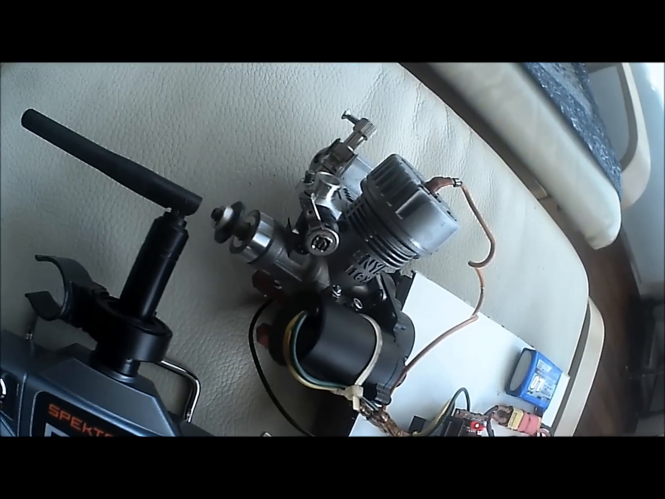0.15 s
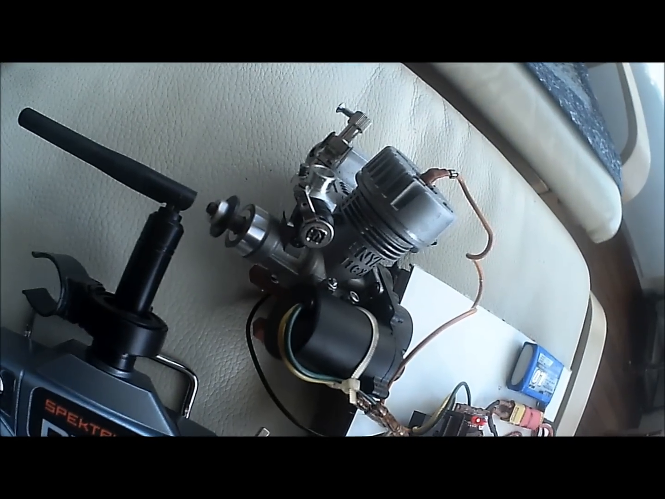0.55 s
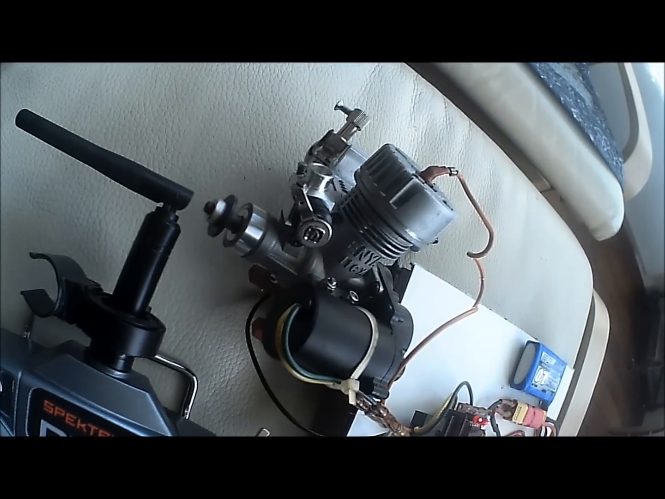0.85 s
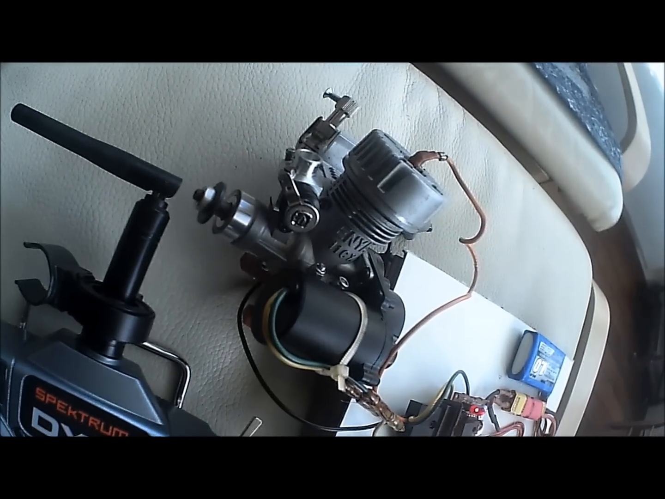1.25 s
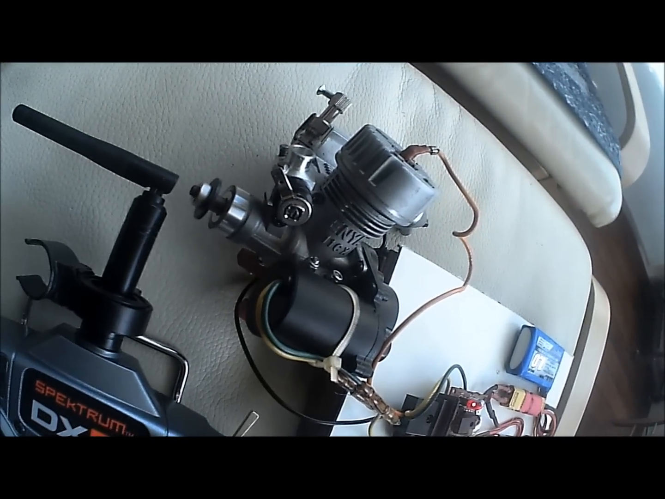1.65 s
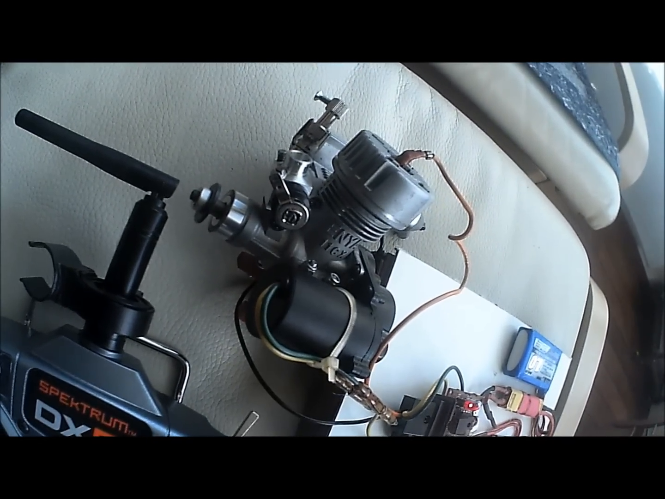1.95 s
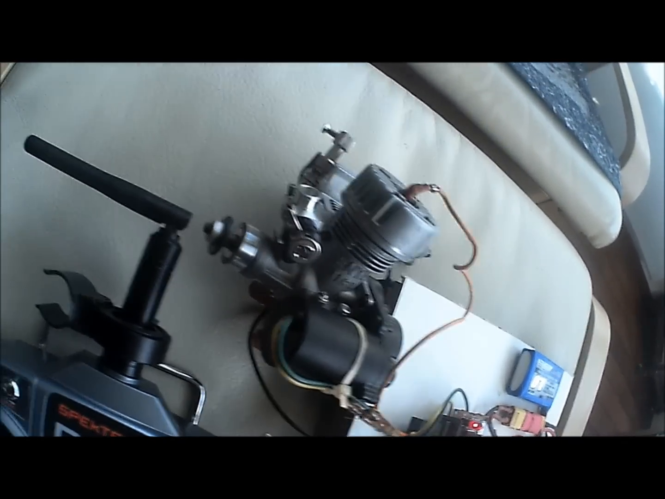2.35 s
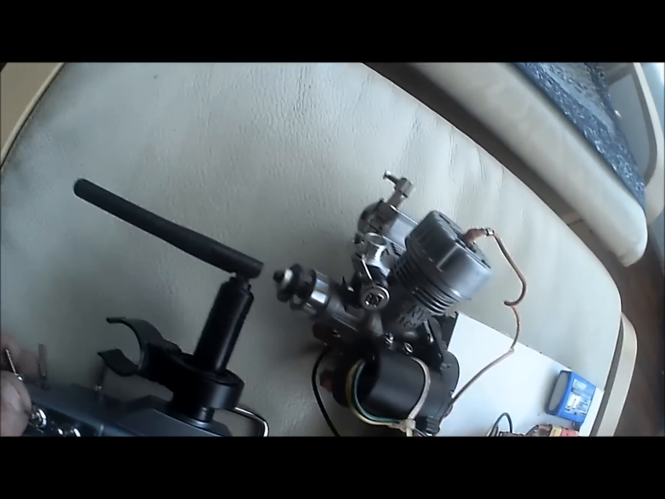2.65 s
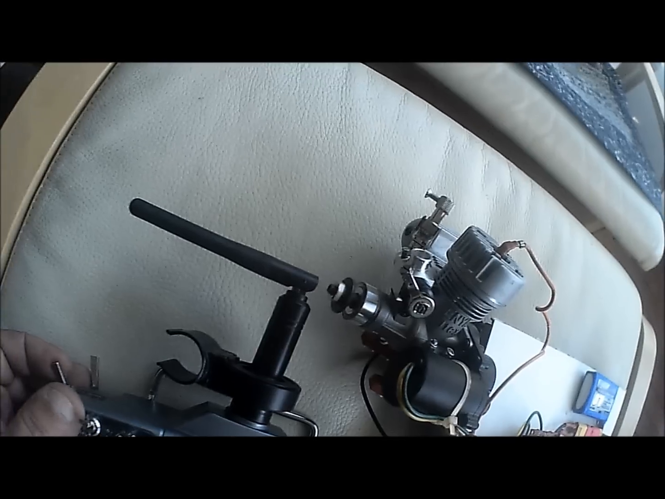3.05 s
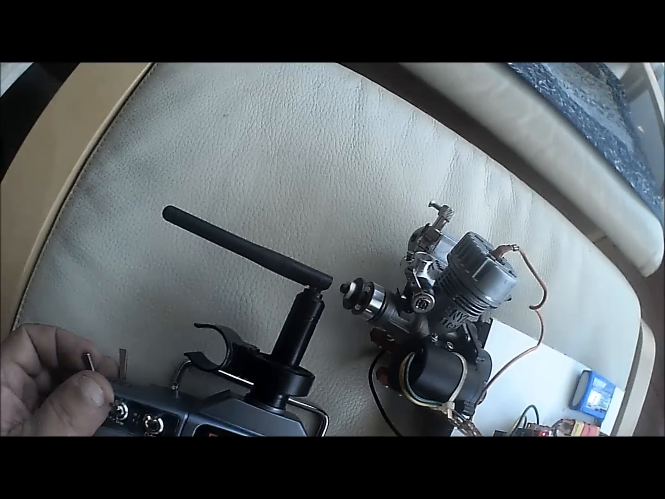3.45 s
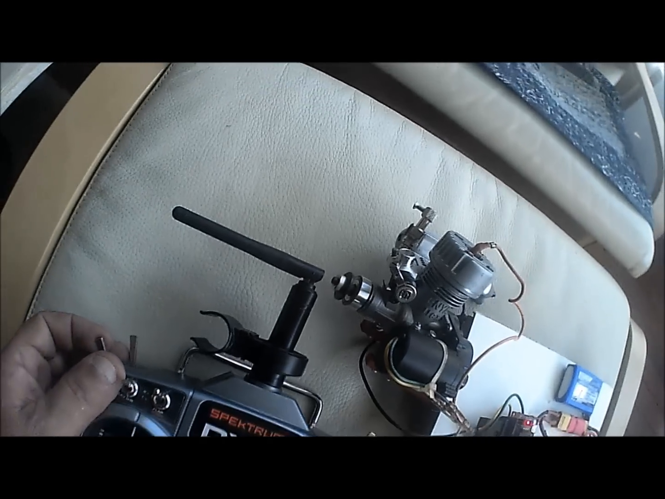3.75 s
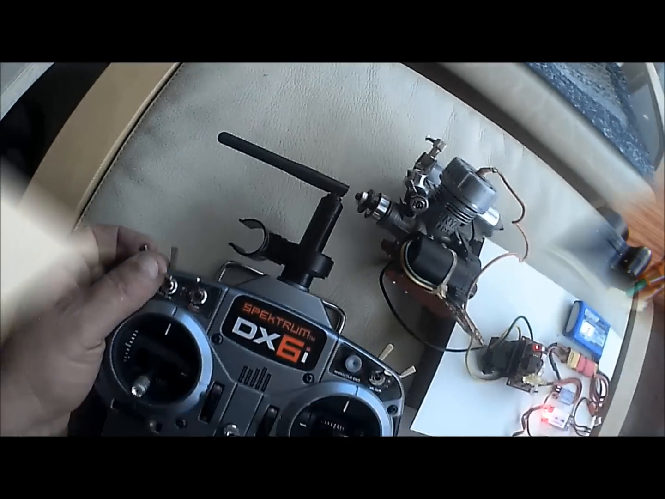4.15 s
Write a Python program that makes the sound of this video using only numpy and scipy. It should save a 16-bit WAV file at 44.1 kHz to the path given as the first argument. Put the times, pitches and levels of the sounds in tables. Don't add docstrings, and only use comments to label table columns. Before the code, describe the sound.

Dull knocks, then a harsh constant low buzz with a gritty metal whine as a starter motor spins a tiny engine close by.

```python
import sys
import numpy as np
from scipy import signal
from scipy.fft import rfft, irfft
from scipy.io import wavfile
from scipy.ndimage import uniform_filter1d

SR = 44100
rng = np.random.default_rng(int(sys.argv[2]) if len(sys.argv) > 2 else 0)


def master_out(mix):
    frames = np.transpose(np.atleast_2d(mix))
    ceiling = np.clip(frames, -1, 1)
    pcm = np.round(ceiling * 32767).astype(np.int16)
    wavfile.write(sys.argv[1], SR, pcm)


def ratio(d):
    e = np.asarray(d, float) / 20
    return 10 ** e


N = 189012
T = np.arange(N) / SR
FULL_SPEED = 71.0


def evened(x):
    return x / np.sqrt(np.mean(x ** 2) + 1e-20)


def curves(rows):
    s, *columns = np.transpose(rows)
    return [np.interp(T, s, column) for column in columns]


def resonate(x, hz, width, skirt=2.8):
    turn = np.exp(2j * np.pi * hz * T)
    for r in np.exp(-np.pi * width * np.array([1, skirt]) / SR):
        baseband = signal.lfilter([1 - r], [1, -r], x / turn)
        x = 2 * (turn * baseband).real
    return x


def causal(hz, db, size=8192):
    log_gain = np.log(ratio(np.interp(np.fft.rfftfreq(size, 1 / SR), hz, db)))
    circle = np.r_[log_gain, log_gain[-2:0:-1]]
    return np.fft.ifft(np.exp(np.conj(signal.hilbert(circle)))).real[:size // 2]


# (time [s], speed [turns per s])
CRANK_SPEED = [(0.0, 56.68), (0.08, 69.3), (0.2, 70.51), (0.5, 70.7), (1.15, 70.64), (1.4, 70.98),
               (1.75, 70.75), (2.9, 70.77), (3.3, 70.42), (3.39, 70.02), (3.44, 71.81), (3.5, 71.58),
               (3.545, 73.05), (3.61, 71.32), (3.69, 71.88), (3.76, 71.69), (4.03, 71.63), (4.29, 71.34)]


def speed():
    return curves(CRANK_SPEED)[0]


def crank(wobble_hz=11.36, width=10.1, depth=0.9, slip_turns=0.0051, first_turn=0.631):
    slip = evened(resonate(rng.standard_normal(N), wobble_hz, width))
    slip /= np.sqrt(uniform_filter1d(slip ** 2, 8000))
    return first_turn + np.cumsum(speed()) / SR + depth * slip_turns * slip


# (time [s], treble reach [dB], share of the moved position [0-1])
CAMERA_PATH = [(0, -3.5, 0.25), (.15, 1.5, 0), (.45, -1.5, 0.07), (.6, 1, 0.04), (.95, 0.5, 0.13),
               (1.45, 0, 0), (1.78, 0, 0), (2.1, 0.5, 0), (2.35, -0.5, 0.1), (2.5, 0.2, 0), (2.75, -2.5, 0),
               (3.15, -2.5, 0), (3.35, -3, 0.15), (3.47, -5.5, 1), (3.8, -5, 1), (4.1, -7, 1),
               (4.29, -5.5, 1)]


def camera():
    return curves(CAMERA_PATH)


def heard(level_db, per_reach, moved_db, power):
    reach_db, moved = camera()
    return ratio(level_db + per_reach * reach_db + moved_db * moved) * (speed() / FULL_SPEED) ** power


def clicks(turns, sizes):
    at = np.flatnonzero(np.diff(np.floor(turns)) > 0)
    late = (np.floor(turns[at + 1]) - turns[at]) / (turns[at + 1] - turns[at])
    out = np.zeros(N)
    out[at] = (1 - late) * sizes[:len(at)]
    out[at + 1] += late * sizes[:len(at)]
    return out


# (time [s], peak level [dB])
SEAT_LURCHES = [
    (.0005, -20),
    (.006, -13),
    (.0393, -11),
    (.0699, -10),
]


def lurch(hz=780.0, t60=0.02):
    out, t = np.zeros(N), T[:2000]
    ringing = ratio(-60 * t / t60) * np.sin(2 * np.pi * hz * t)
    for s, db in SEAT_LURCHES:
        out[round(s * SR):][:len(t)] += ratio(db) * ringing
    return out


# (frequency [Hz], density [dB per Hz])
NOISE_FLOOR = [(20, -60), (50, -62), (100, -65), (170, -61), (300, -58.5), (600, -60), (1500, -107),
               (2400, -57.5), (6000, -63), (16000, -83)]


def rumble():
    hz, db = np.transpose(NOISE_FLOOR)
    log_hz = np.log(np.fft.rfftfreq(N, 1 / SR) + 1)
    colour = ratio(np.interp(log_hz, np.log(hz), db))
    return irfft(rfft(rng.standard_normal(N)) * colour, N) * np.sqrt(SR / 2) * ratio(-11.5)


def strain(turns, level_db=-27.0, short_by=1.7):
    load = np.clip((FULL_SPEED - 0.5 - speed()) / short_by, 0, 1)
    return ratio(level_db) * load * np.cos(2 * np.pi * (7 * turns + 0.1))


# (exhaust near [dB], intake near [dB], exhaust moved [dB], intake moved [dB])
PORT_ORDERS = [(-20, -32, -22, -38), (-9, -22, -12, -29), (-11, -24, -11, -32), (-11, -30, -12, -35),
               (-8, -27, -11, -29), (-29, -16, -29, -15), (-6, -8, -7, -10), (-17, -12, -15, -14),
               (-7, -11, -11, -22), (-15, -10, -21, -26), (0, -23, 1, -17), (-10, -11, -8, -11),
               (-8, -13, -9, -19), (-15, -27, -16, -29), (-12, -31, -13, -28), (-8, -9, -7, -10),
               (-7, -6, -6, -16), (-3, -14, 1, -15), (-16, -3, -15, -6), (0, -17, -7, -25),
               (-13, -15, -15, -13), (-18, -15, -25, -25), (-15, -36, -21, -38), (-30, -23, -31, -21),
               (-22, -19, -30, -27), (-31, -20, -35, -27), (-28, -30, -38, -36), (-31, -29, -34, -43),
               (-30, -31, -35, -45)]


def port(train, column, hz):
    k, db = np.arange(len(PORT_ORDERS)) + 1, np.transpose(PORT_ORDERS)[column]
    colour_hz = np.r_[0, k, k[-1] + 3, 60] * hz
    colour_db = np.r_[db[0] - 14, db, db[-1] - 9, db[-1] - 40]
    return signal.oaconvolve(train, causal(colour_hz, colour_db))[:N]


def exhaust(turns, vary_db=-0.03, gulp_vary_db=1.0, loose=0.0026):
    draws = rng.standard_normal((400, 3))
    turns = turns + 0.023
    puffs = clicks(turns, ratio(vary_db * draws[:, 0]))
    uneven = loose * uniform_filter1d(draws[turns.astype(int), 1], 300)
    gulps = -clicks(turns - 0.545 - uneven, ratio(gulp_vary_db * draws[:, 2]))
    gulps *= (speed() / FULL_SPEED) ** 3.2
    near = evened(port(puffs, column=0, hz=70.75) + port(gulps, column=1, hz=70.75))
    far = evened(port(puffs, column=2, hz=71.7) + port(gulps, column=3, hz=71.7))
    moved = np.clip(camera()[1], 0, 1)
    blend = (1 - moved) * near + moved * far
    return heard(level_db=-13.5, per_reach=0.34, moved_db=0.5, power=0.5) * blend


# (frequency [Hz], width [Hz], level [dB])
BODY_MODES = [(477, 310, -62), (767, 65, -30), (1090, 140, -40), (1299, 115, -18), (1580, 97, -45)]


def thump(turns, force, at=0.47, fade=0.3, rest=0.08, vary_db=1.2):
    size = ratio(vary_db * force[(turns - at + 1).astype(int)])
    stroke = size * np.exp(-((turns - at) % 1) / fade)
    drive = rng.standard_normal(N) * (rest + stroke) * (speed() / FULL_SPEED) ** 0.58
    return sum(ratio(db - 6.0) * evened(resonate(drive, hz, width)) for hz, width, db in BODY_MODES)


def scrape(turns, at, fade, again, blow, brief):
    angle = (turns - at) % 1
    second = again * np.exp(-((angle - 0.27) / brief) ** 2)
    return blow * np.exp(-angle / 0.031) + np.exp(-angle / fade) + second


def ring(turns, modes, force, at=0.468, fade=0.27, rest=0.15, again=0.3, shared_db=-1.0, own_db=9.0,
         grain_db=3.5, blow=1.5, tick=5.4, brief=0.096):
    moved, turn, out = camera()[1], (turns - at + 1).astype(int), 0
    stroke = scrape(turns, at, fade, again, blow, brief)
    grit = ratio(grain_db * rng.standard_normal(N))
    ticks = tick * clicks(turns - at - 0.02, rng.choice([-1.0, 1.0], 400))
    for hz, width, db, change_db in modes:
        size = ratio(shared_db * force + own_db * np.minimum(rng.exponential(1, 400), 2.5))
        size = size[turn] / np.median(size)
        drive = size * ticks + (size * stroke + rest) * grit * rng.standard_normal(N)
        out = out + ratio(db + change_db * moved) * evened(resonate(drive, hz, width))
    return out


# (time [s], gain of the lowest three case modes [dB], gain of the
# other case modes and fins [dB])
HARD_TURNS = [(.531, 2, 4), (.956, 3.5, 0.5), (1.351, 1, -1), (1.436, 8.5, 7.5), (1.549, 9, 1),
              (1.761, 5, 2), (1.945, 3, -1), (1.96, 6.5, 1), (2.07, 0, 4), (2.326, 8, 1), (2.34, 5, 1),
              (2.467, -2, -1), (2.482, 7.5, 1), (3.004, 6, 2), (3.302, -2, 6), (3.554, 8.5, 2),
              (3.708, 5.5, 6), (3.904, 6.5, -3), (4.197, 6, 2), (4.225, -1, 6.5)]


def landings():
    s, *more_db = np.transpose(HARD_TURNS)
    during = (T >= s[:, None]) & (T < s[:, None] + 1 / FULL_SPEED)
    return ratio(np.array(more_db) @ during)


# (frequency [Hz], width [Hz], level [dB], change once moved [dB])
CASE_MODES = [(2754, 280, -12.5, 3.5), (3290, 510, -16.5, 2.5), (3570, 230, -0.5, 1.5), (4822, 80, -10, 2),
              (4600, 730, -10.5, 5), (5163, 126, -16, -1), (6650, 440, -15.5, 5.5), (7534, 400, -9, 2.5),
              (8600, 550, -16.5, 0), (10050, 700, -16, 0)]


def case(turns, force, low_hard, high_hard):
    low = ring(turns, CASE_MODES[:3], force, fade=0.16, rest=0.29, again=0.48, own_db=1.4,
               blow=2.4, tick=5.9, brief=0.061)
    high = ring(turns, CASE_MODES[3:], force, fade=0.21, rest=0.22, again=0.48, own_db=0.7,
                blow=0.68, tick=9.7, brief=0.07)
    gain = heard(level_db=-27.5, per_reach=1.01, moved_db=1, power=0.5)
    return gain * (low_hard * low + high_hard * high)


# (frequency [Hz], width [Hz], level [dB], change once moved [dB])
FIN_MODES = [(11440, 180, -7, -4), (11840, 420, -13, -7), (12440, 760, -3.5, .8), (12700, 270, -7, 2),
             (13560, 440, -7.5, 5), (14100, 400, -7, -.5), (14430, 250, -8, -4.), (14800, 200, -12, -.5),
             (15250, 500, -22, 0)]


def fins(turns, force, hard):
    fizz = ring(turns, FIN_MODES, force, fade=0.46, rest=0.06, again=0.93, shared_db=0.5,
                own_db=-1.5, blow=0.3, tick=3.4, brief=0.028)
    return heard(level_db=-35, per_reach=0.5, moved_db=-1.4, power=0) * hard ** 0.6 * fizz


# (frequency [Hz], width [Hz], level [dB], change once moved [dB])
BEARING_MODES = [(11680, 90., -3, -.5), (11751, 6., -8, -3.), (12305, 7., -8, -.5), (14465, 60., .5, -.5)]


def squeals(turns, force):
    squeal = ring(turns, BEARING_MODES, force, rest=0.41, again=0.62, shared_db=1.5, own_db=2.0)
    return heard(level_db=-38, per_reach=2.6, moved_db=3, power=8) * squeal


def scene():
    turns, force = crank(), rng.standard_normal(400)
    case_hard, fins_hard = landings()
    mix = lurch() + rumble() + strain(turns) + exhaust(turns) + thump(turns, force)
    mix += case(turns, force, case_hard, fins_hard)
    mix += fins(turns, force, fins_hard) + squeals(turns, force)
    return mix[None]


def low_pass(x):
    return signal.sosfilt(signal.butter(12, 16100, fs=SR, output="sos"), x)


# (frequency [Hz], half width [Hz], gain [dB])
OVERALL_COLOUR = [(35, 15, 2), (71, 18, 3.5), (140, 104, -1.3), (253, 130, 0.6), (848, 19, 2.5),
                  (2396, 260, -11), (4160, 394, -15), (5930, 320, -9.5), (7320, 147, -10.5),
                  (10580, 260, -6), (12980, 150, -9)]


def record(dry):
    hz = np.fft.rfftfreq(N, 1 / SR)
    dips_db = sum(db * np.exp(-((hz - f) / width) ** 2) for f, width, db in OVERALL_COLOUR)
    x = np.clip(irfft(rfft(dry) * ratio(dips_db), N), -1, 1)
    roll_off_db = -40.0 * np.clip((hz - 15700) / 130, 0, 2) ** 2
    x = irfft(rfft(x) * ratio(roll_off_db), N)
    return low_pass(x)


dry = scene()
out = record(dry)
master_out(out)
```